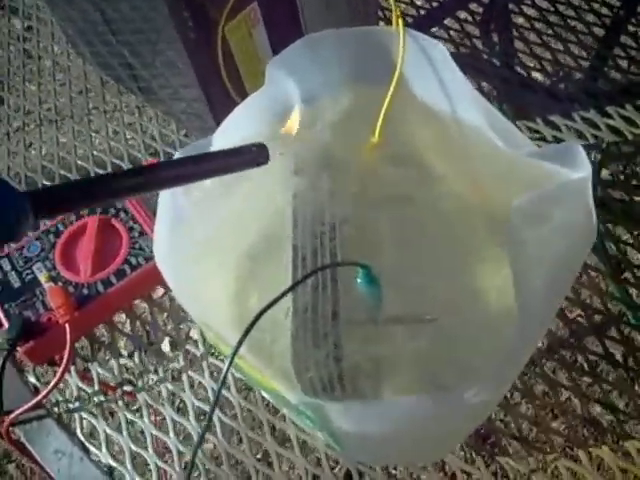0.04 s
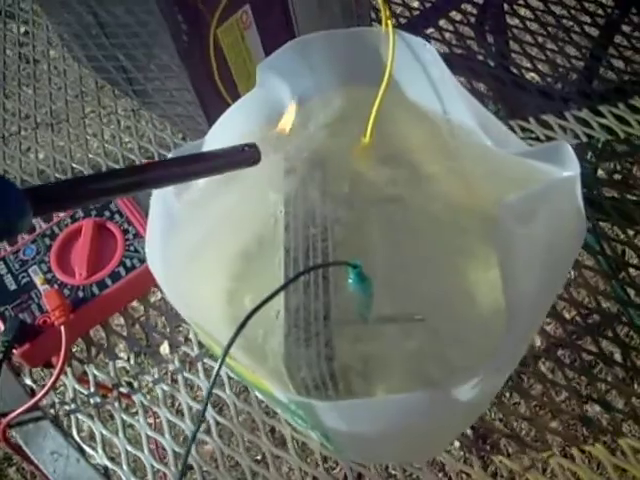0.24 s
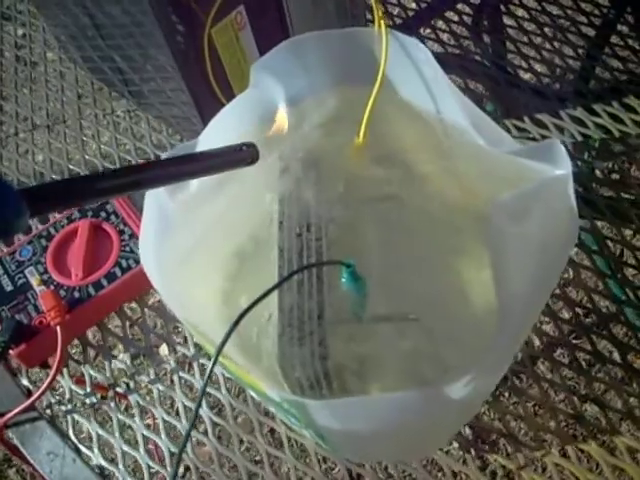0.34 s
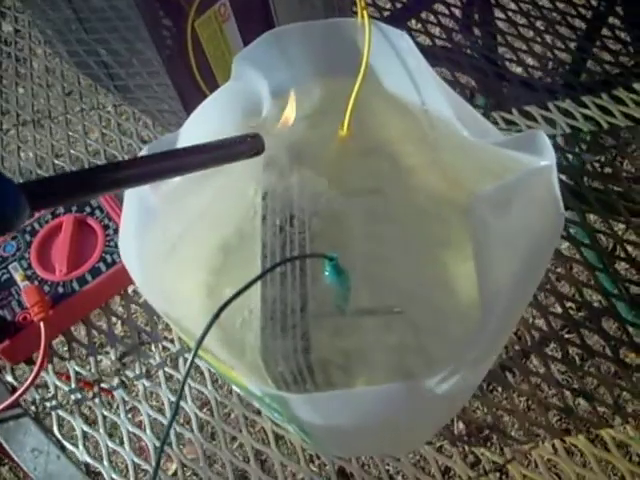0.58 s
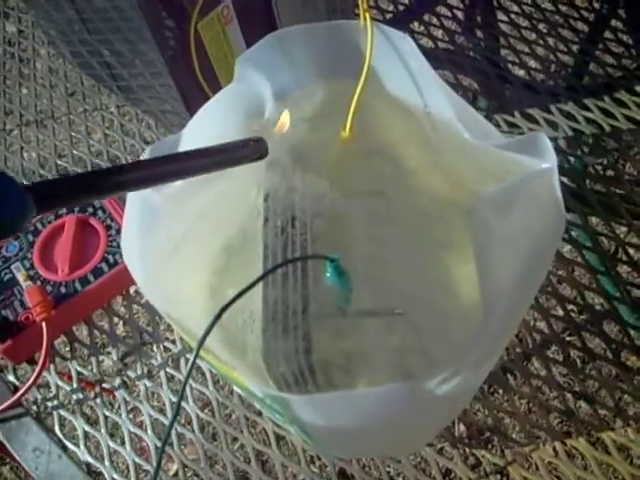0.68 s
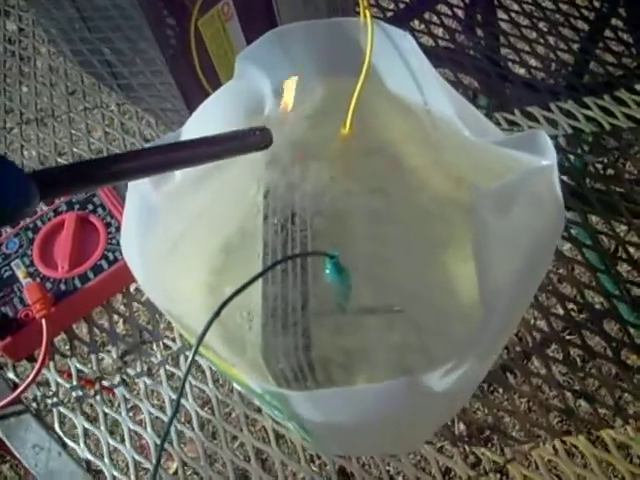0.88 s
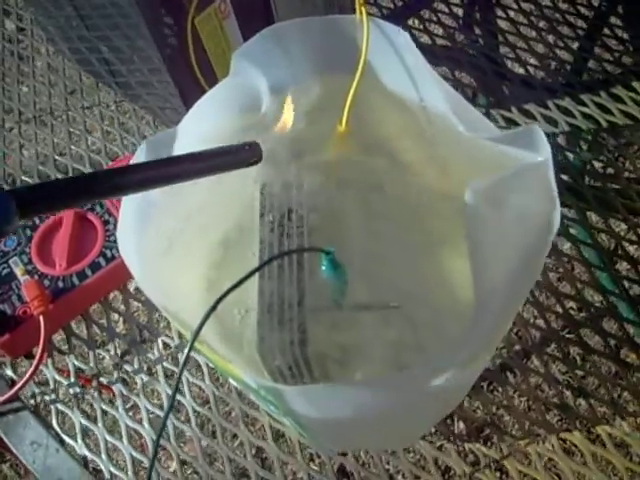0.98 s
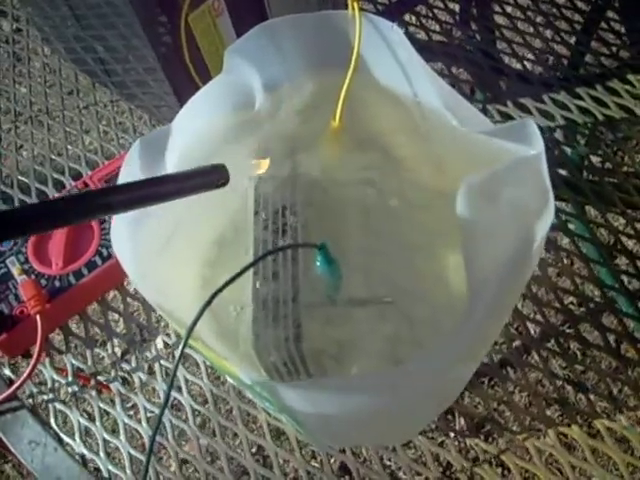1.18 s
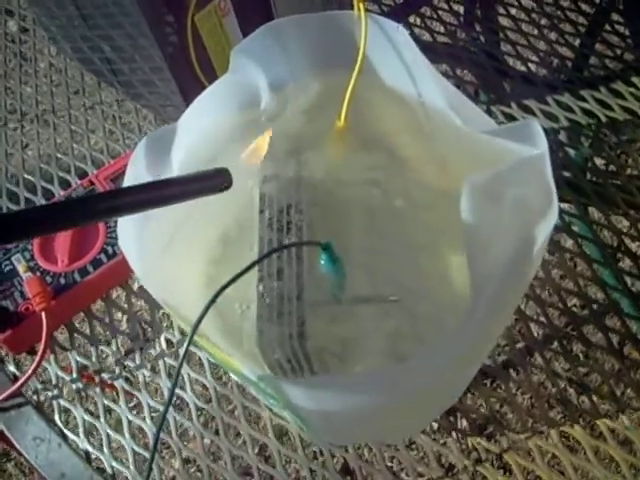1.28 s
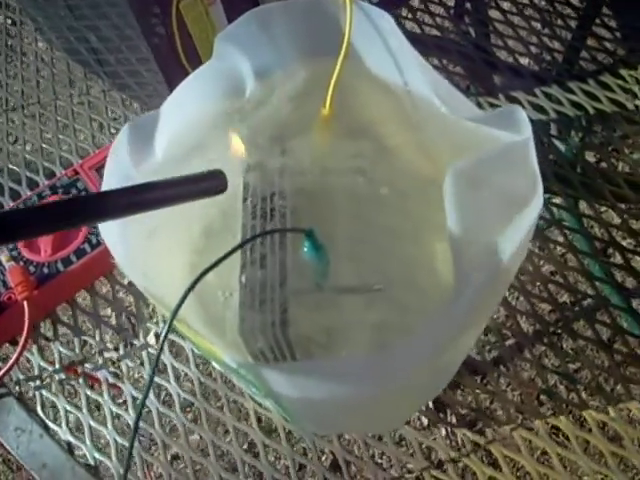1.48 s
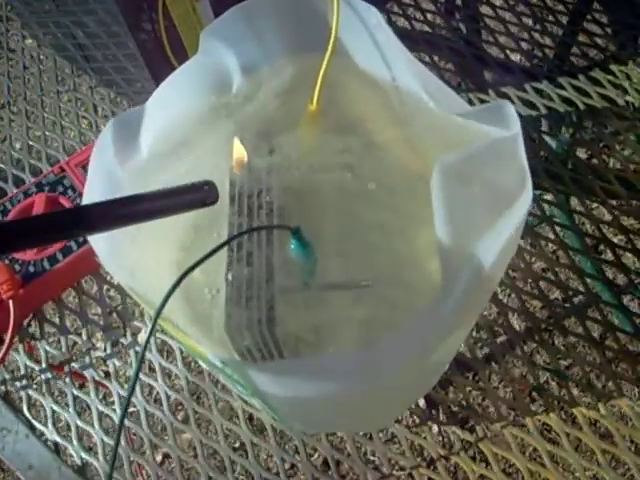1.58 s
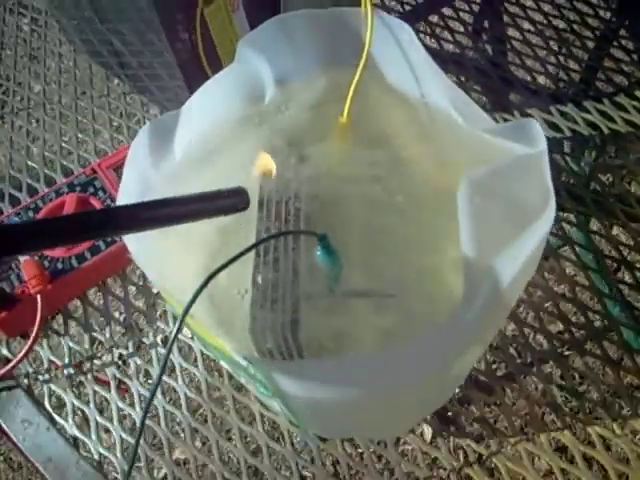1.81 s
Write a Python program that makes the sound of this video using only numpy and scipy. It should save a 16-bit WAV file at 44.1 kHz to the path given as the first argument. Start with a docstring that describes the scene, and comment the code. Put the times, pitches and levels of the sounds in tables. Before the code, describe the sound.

Gas bubbles in a plastic jug pop sharply twice, a second apart, as a lighter ignites them, overloading the microphone. Steel rings faintly and tiny bubbles tick, over a distant engine hum and soft outdoor hiss.

```python
"""Popping gas bubbles outdoors

A lighter flame sets off gas bubbles on an electrolysis cell in a plastic jug: a double pop, then a
single one. Each pop is a very short ring near 3 kHz that overloads the microphone, bounces off the
surroundings and leaves nearby steel ringing faintly. Tiny bubbles tick on the liquid, and an engine
hums some way off over a soft hiss."""
import sys
import numpy as np
from scipy import signal
from scipy.fft import rfft, irfft
from scipy.io import wavfile

SR = 44100
rng = np.random.default_rng(int(sys.argv[2]) if len(sys.argv) > 2 else 0)


def pcm_store(signal):
    """Save signal as 16-bit PCM."""
    levels = np.round(np.clip(np.atleast_2d(signal), -1, 1) * 32767)
    wavfile.write(sys.argv[1], SR, levels.astype(np.int16).T)


N = 81585

# the pops: t/s, strength/dB, pitch ratio, sharpness/dB per octave, echo gain/dB, echo treble/dB
POPS = [(0.2133, 2.5, 1.015, -12.5, -2, -8.5), (0.2193, 0, 1.025, -6, -6.5, -7.5),
        (1.2131, 2.5, 0.994, 13.5, -2, 9)]
# tones inside a pop: f/Hz, relative level/dB, fade/s (a fade is the time to drop by 60 dB)
POP_TONES = [(2137, -9.5, 0.0036), (2801, -9, .00714), (3118, -0.3, 0.0086), (3815, -0.5, .00208),
             (7450, -30.5, 0.0056)]
# echo from the jug and surroundings: f/Hz, relative level/dB, fade/s
ECHO_BANDS = [(298.7, -14, 0.087), (1220, -24, 0.065), (1740, -3.5, 0.091), (2500, -7, 0.14),
              (3050, 2, .085), (3904, -12, 0.13), (4800, -16.5, 0.089), (5700, -30, 0.097),
              (6800, -25.5, 0.097), (7900, -35, 0.065), (10000, -33.5, .06), (12000, -46, 0.07)]
# tones of the nearby steel: f/Hz, level/dB, fade/s, beat rate/Hz
STEEL_TONES = [(2500, -58, 1.8, 12), (4750, -78, 1.6, 4.7)]
# how hard the pops set the steel ringing: t/s, gain/dB
STEEL_KICKS = [(.22, 0.5), (1.213, -9)]
# tiny bursting bubbles: t/s, level/dB, f/Hz
TICKS = [(0.256, -53, 4750), (1.3055, -56, 4700), (1.366, -52, 4460), (1.386, -70, 6300),
         (1.482, -57.5, 4400), (1.595, -60, 4360), (1.6877, -48.5, 4520), (1.700, -54, 4650)]
# engine speed: t/s, cycle rate/Hz
ENGINE_SPEED = [(0, 17.14), (.7, 17.8), (1.3, 17.24), (1.85, 16.95)]
# the engine's low tones: multiple of the cycle rate, early level/dB, late level/dB
HUM_TONES = [(4, -63.5, -63.5), (8, -65.5, -67.5), (12, -64, -61.5), (16, -69, -74), (18, -72.5, -71),
             (20, -71, -76.5), (23, -80.5, -70.5), (25, -81, -70.5)]
# its upper tones, before the swell: multiple of the cycle rate, early level/dB, late level/dB
DRONE_TONES = [(29, -69, -74.5), (31, -67.5, -69.5), (33, -70, -65), (35, -64.5, -72), (37, -62.5, -72.5),
               (39, -62.5, -71), (40, -72, -73), (41, -75, -69.5), (42, -74.5, -65.5), (44, -82, -70),
               (52, -77.5, -69)]
# how the upper tones swell and fade: t/s, gain/dB
DRONE_SWELL = [(0, -4), (.3, -9.5), (.7, 2), (1.0, -4), (1.2, -4), (1.45, 0), (1.7, 1), (1.85, -7.5)]
# tone colour of the outdoor noise: f/Hz, relative level/dB
AIR_COLOUR = [(20, -23), (45, -9.5), (70, -2.5), (105, 0.5), (160, 0.5), (300, 1.5), (460, -3.5),
              (700, 0.5), (1000, -0.5), (1500, -3), (2300, -5.5), (2800, -5), (3300, -1), (3900, -16),
              (5000, -28), (10300, -29.5), (12500, -43)]
# loudness of the outdoor noise: t/s, level/dB
AIR_LEVEL = [(0, -53.5), (.35, -53), (.8, -53), (1.1, -53), (1.5, -53.5), (1.75, -54), (1.85, -55)]
# rise and fall of its hiss near 3 kHz: t/s, gain/dB
HISS_GAIN = [(0, 1.1), (.35, 1.3), (.8, -0.27), (1.1, 0), (1.5, -2.4), (1.85, -0.86)]


def pop(strength_db, pitch, sharpness_db, main_hz=3118, rise_s=0.000074):
    """The blast kicks a few tones that die fast; a sharper blast favours the high ones."""
    t = np.arange(SR // 20) / SR
    ring = 0
    for hz, db, fade_s in POP_TONES:
        tilt_db = sharpness_db * np.log2(hz / main_hz)
        ring += amp(db + tilt_db - 60 * t / fade_s) * np.sin(2 * np.pi * hz * pitch * t)
    return -amp(strength_db) * (1 - np.exp(-t / rise_s)) * ring  # swings negative first


def echo(gain_db, treble_db, base_db=-29, treble_hz=5920, width_hz=1700):
    """Many faint reflections blur into noise, each band dying at its own speed."""
    hz, t, bands = signal.stft(rng.standard_normal(SR // 4), SR, nperseg=128)
    treble = amp(treble_db * np.exp(-((hz - treble_hz) / width_hz) ** 2))
    colour = unit(amp(over_pitch(ECHO_BANDS, hz))) * treble
    fade = amp(-60 * t / over_pitch(ECHO_BANDS, hz, column=2)[:, None])
    return amp(base_db + gain_db) * signal.istft(bands * colour[:, None] * fade, SR)[1]


def pops(echo_delay_s=0.0025):
    """Each time the gas catches fire, it pops and an echo follows."""
    out = np.zeros(N)
    for start, strength_db, pitch, sharpness_db, echo_db, treble_db in POPS:
        add(out, start, pop(strength_db, pitch, sharpness_db))
        add(out, start + echo_delay_s, echo(echo_db, treble_db))
    return out


def steel():
    """Steel rings on after the pops, in pairs of tones so close that they throb (beat)."""
    out, t = np.zeros(N), np.arange(SR) / SR
    ring = 0
    for hz, db, fade_s, beat_hz in STEEL_TONES:
        pair = np.sin(2 * np.pi * hz * t) - 0.5 * np.sin(2 * np.pi * (hz + beat_hz) * t)
        ring += amp(db - 60 * t / fade_s) * pair
    for start, db in STEEL_KICKS:
        add(out, start, amp(db) * ring)
    return out


def ticks(rise_s=0.0008, fade_s=0.01, spit_gain=0.68, width_hz=450):
    """Small bubbles burst unlit, each a short ping with a spit of noise."""
    out, t = np.zeros(N), np.arange(2048) / SR
    hz = np.fft.rfftfreq(len(t), 1 / SR)
    for start, db, pitch_hz in TICKS:
        noise = rfft(rng.standard_normal(len(t)))
        spit = unit(irfft(noise / (1 + 1j * (hz - pitch_hz) / width_hz)))  # strongest near the ping
        ping = np.sin(2 * np.pi * pitch_hz * t)
        loudness = amp(db - 60 * t / fade_s) * (1 - np.exp(-t / rise_s))
        add(out, start, loudness * (ping + spit_gain * spit))
    return out


def engine(shift_at_s=1.06, shift_s=0.18, waver_db=1.65):
    """An engine hums at multiples of its cycle rate; their balance shifts just past the middle."""
    cycles = np.cumsum(over_time(ENGINE_SPEED)) / SR
    late = 0.5 + 0.5 * np.tanh((np.arange(N) / SR - shift_at_s) / shift_s)  # glides from 0 to 1

    def tone(multiple, early_db, late_db):
        """One engine tone with a wavering level."""
        db = early_db + (late_db - early_db) * late + waver_db * waver(rate_hz=5)
        return amp(db) * np.sqrt(2) * np.sin(2 * np.pi * (multiple * cycles + rng.random()))

    hum = sum(tone(*row) for row in HUM_TONES)
    drone = sum(tone(*row) for row in DRONE_TONES)
    return hum + amp(over_time(DRONE_SWELL)) * drone


def air(hiss_hz=3054, width_hz=1018, waver_db=0.2):
    """Soft outdoor noise whose hiss eases off a little."""
    hz = np.fft.rfftfreq(N, 1 / SR)
    noise = unit(irfft(rfft(rng.standard_normal(N)) * amp(over_pitch(AIR_COLOUR, hz)), N))
    hiss = irfft(rfft(noise) * np.exp(-((hz - hiss_hz) / width_hz) ** 2), N)
    loudness = amp(over_time(AIR_LEVEL) + waver_db * waver(rate_hz=6.8))
    return loudness * (noise + (amp(over_time(HISS_GAIN)) - 1) * hiss)


def amp(db):
    """Turns decibels into a number to multiply by."""
    return 10 ** (np.asarray(db) / 20)


def unit(x):
    """Scales a signal to an average size (rms) of 1."""
    return x / np.sqrt(np.mean(x ** 2) + 1e-20)


def over_time(table):
    """Reads a time table at every sample."""
    rows = np.array(table)
    return np.interp(np.arange(N) / SR, rows[:, 0], rows[:, 1])


def over_pitch(table, hz, column=1):
    """Reads a frequency table, with octaves evenly spaced."""
    rows = np.array(table)
    return np.interp(np.log(hz + 1), np.log(rows[:, 0]), rows[:, column])


def add(mix, start_s, sound):
    """Mixes a sound in at a given time."""
    part = mix[max(round(start_s * SR), 0):][:len(sound)]
    part += sound[:len(part)]


def waver(rate_hz):
    """A slow random drift, about 1 in size."""
    hz = np.fft.rfftfreq(2 * N, 1 / SR)
    return unit(irfft(rfft(rng.standard_normal(2 * N)) * np.exp(-(hz / rate_hz) ** 2)))[:N]


def scene():
    """All the sources together in one channel."""
    return (pops() + steel() + ticks() + engine() + air())[None]


def record(dry, fold_at=0.54, fold_slope=0.72, top=0.98, ceiling=0.78, dull_hz=11500, edge_hz=16800):
    """The overloaded microphone folds negative peaks back, flattens positive ones and cuts high treble."""
    overshoot = np.maximum(-dry - fold_at, 0)
    folded = np.minimum(dry + (1 + fold_slope) * overshoot, top)
    hz = np.fft.rfftfreq(N, 1 / SR)
    dull = irfft(rfft(folded) / np.sqrt(1 + (hz / dull_hz) ** 56), N)
    clipped = np.clip(dull, -ceiling, ceiling)
    treble_cut = signal.firwin(511, edge_hz, window=("kaiser", 9), fs=SR)
    return signal.oaconvolve(clipped, treble_cut[None], "same")


dry = scene()
out = record(dry)
pcm_store(out)
```